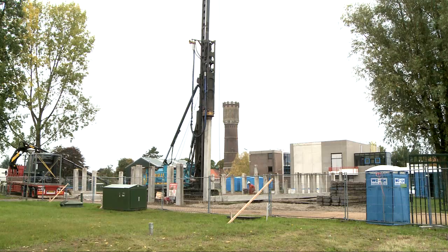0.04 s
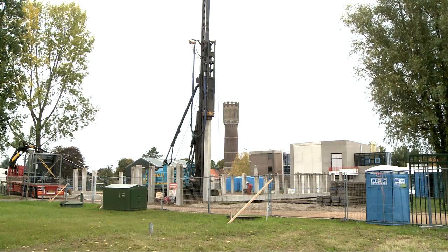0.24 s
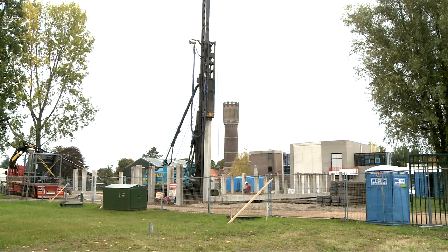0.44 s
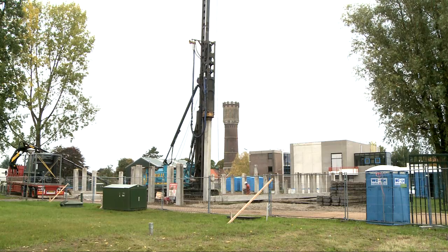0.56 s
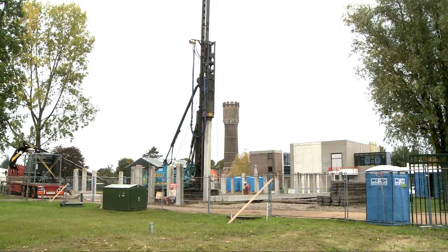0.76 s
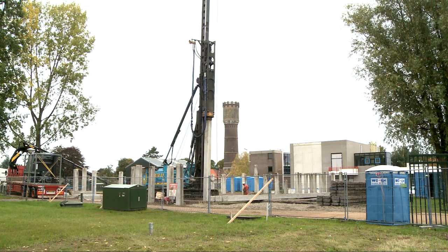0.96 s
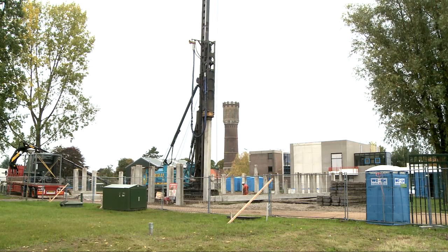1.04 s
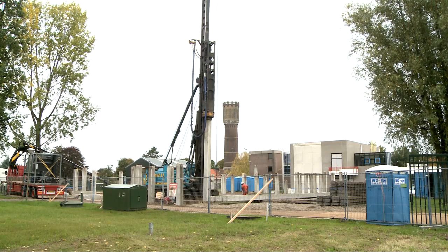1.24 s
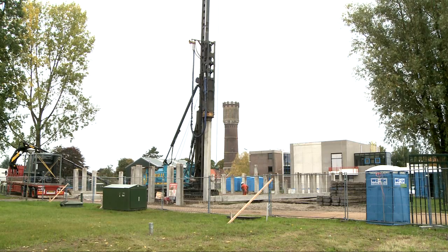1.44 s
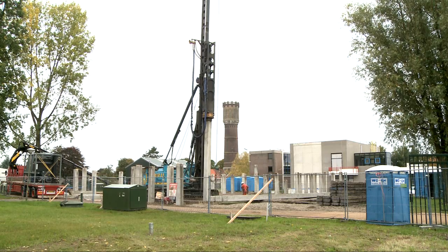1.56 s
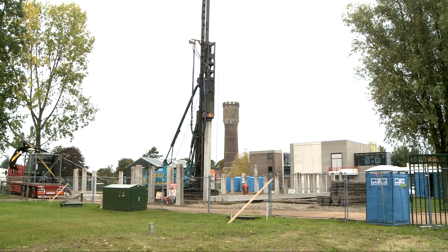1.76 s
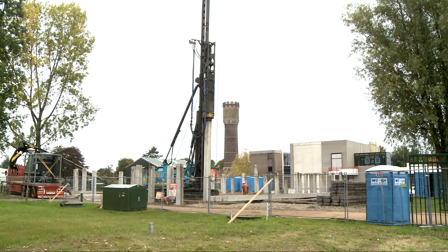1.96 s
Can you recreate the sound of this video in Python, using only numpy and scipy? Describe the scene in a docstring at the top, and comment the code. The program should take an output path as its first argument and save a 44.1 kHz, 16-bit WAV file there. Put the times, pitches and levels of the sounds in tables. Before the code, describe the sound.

A pile driver hits a concrete pile twice, each loud blow thumping, ringing the steel rig and echoing off distant buildings. Metal clanks and chinks between blows over a steady diesel, outdoors, left of the microphone.

```python
"""An open building site, a pile driver to the left of a stereo microphone. The ram falls twice on a
concrete pile, thumps the ground and rings the steel rig; distant buildings throw each blow back.
Between blows the hammer gear clanks and small steel parts chink, over a steady diesel.
The blows overload the recorder, whose limiter then holds the louder left side down."""
import sys
import numpy as np
from scipy import signal
from scipy.fft import rfft, irfft, next_fast_len
from scipy.io import wavfile
from scipy.ndimage import uniform_filter1d, minimum_filter1d, map_coordinates

SR = 44100
rng = np.random.default_rng(int(sys.argv[2]) if len(sys.argv) > 2 else 0)


def bounce(signal):
    """Save signal as a 16-bit WAV file at the path given by the first command-line argument."""
    frames = np.transpose(np.atleast_2d(signal))
    limited = np.clip(frames, -1, 1)
    pcm = np.round(limited * 32767).astype(np.int16)
    wavfile.write(sys.argv[1], SR, pcm)


N = 88200
T = np.arange(N) / SR

# long modes of the steel mast and hammer cage: f/Hz, level/dB, t60/s
MAST_MODES = [(176.4, -3.5, 1.06), (361.5, -1.5, 0.88), (409, -1, 1.05), (668, -1.5, 0.75), (811, -7, 0.86),
              (1028, -2.5, 1.17), (1065, -6, 1.32), (1222, -22, 0.55), (1557, -5.5, 0.82),
              (2220, -19, 0.91), (2312, -5.5, 1.33), (2595, -11, 0.86), (3133, -37, .7), (3404, -14, 1)]


def ram():
    """Each blow cracks, thumps the ground, rings pile and mast, and returns from the buildings."""
    # ram blows: t/s, level/dB, mast ring/dB, echo delay/s, echo/dB
    blows = [(0.348, 0, 2, 0.0976, -0.5), (1.5116, 0, 1, 0.0961, -1)]
    # short modes of helmet and pile: f/Hz, level/dB, t60/s
    pile_modes = [(180.8, -5.5, .3), (338.5, -14.5, 0.097), (424, -1, .12), (466.4, -8, .1), (780, 0, 0.1),
                  (855, 1.5, 0.088), (1013.6, -4.5, 0.13), (1082, 1.5, 0.056), (1235, -4.5, 0.083),
                  (1415, -14.5, 0.09), (1563, 0.5, 0.11), (1985, -10, 0.043), (2160, -4, 0.075),
                  (2612, -11.5, 0.15)]
    # spectrum of the impact: f/Hz, density/dB
    crack_spectrum = [(40, -14), (130, -3.5), (260, -5.5), (450, 3), (1000, -5), (2500, -6.5),
                      (3500, -14.5), (5000, -27), (9000, -28), (15000, -47)]
    # spectrum of its echo off the buildings: f/Hz, density/dB
    echo_spectrum = [(30, -7), (58, 2), (130, 9.5), (400, 0.5), (1000, -15), (2500, -2), (4000, -15.5),
                     (6000, -28.5), (14000, -44)]
    out = np.zeros((2, N))
    for s, db, ring_db, delay, echo_db in blows:
        crack = amp(-2.5) * noise(crack_spectrum) * envelope(s, rise=0.0032, hold=0.012, t60=0.048)
        ground = amp(1.5) * thump(s, hz=87.1, rise=0.0067, hold=0.014, t60=0.082)
        pile = amp(-4.5) * ring(s, pile_modes, rise=0.0018, drift=0.2, spread_s=0.00298)
        mast = amp(-21.5 + ring_db) * ring(s, MAST_MODES, rise=0.0036, drift=0.64)
        echo = amp(-16.5) * noise(echo_spectrum) * envelope(s + delay, rise=0.0079, hold=0.021, t60=0.19)
        boom = amp(-8) * thump(s + delay, hz=84.36, rise=0.0124, hold=0.024, t60=0.34)
        tail = amp(-12.5) * site_tail(s, rise=0.015)
        out += amp(db) * (crack + ground + pile + mast + tail + amp(echo_db) * (echo + boom))
    return out * pan(left_db=0.5)


def thump(s, hz, rise, hold, t60):
    """A few low cycles of pile and ground."""
    return envelope(s, rise, hold, t60) * np.sin(2 * np.pi * hz * (T - s))


def ring(s, modes, rise, drift, spread_s=0):
    """Modes struck at time s, each starting within spread_s and wandering by about drift radians."""
    out = np.zeros(N)
    for hz, db, t60 in modes:
        start = s + spread_s * rng.random()
        phase = 2 * np.pi * (hz * (T - start) + rng.random()) + drift * wobble(39.94)
        out += amp(db + rng.normal(0, 1)) * envelope(start, rise, 0, t60) * np.sin(phase)
    return out


def site_tail(s, rise):
    """Scatter from the ground and the site around; each frequency dies at its own speed."""
    # spectrum of the scatter: f/Hz, density/dB
    scatter_spectrum = [(30, -3), (60, 0), (130, 3.5), (260, -0.5), (420, 1.5), (1000, -7), (1700, -8.5),
                        (2500, -7.5), (3500, -18), (5000, -31), (10000, -34.5), (15000, -50)]
    # decay of the site: f/Hz, t60/s
    decay_times = [(60, 1.16), (200, 1.42), (500, 1), (2500, 1.42), (5000, 1.25), (14000, 0.86)]
    hz, t, bands = signal.stft(noise(scatter_spectrum), SR, nperseg=512)
    fade = np.exp(-np.log(1000) * np.maximum(t - s, 0) / along(decay_times, hz)[:, None])
    tail = signal.istft(bands * fade, SR, nperseg=512)[1][:, :N]
    return tail * np.clip((T - s) / rise, 0, 1)


def gear():
    """The hammer gear clanks: a dense steel clatter that also stirs the mast."""
    # clanks: t/s, level/dB, rise/s, t60/s, low edge/Hz, high edge/Hz
    clanks = [(0.111, -30.5, 0.0027, 0.37, 890, 3270), (0.251, -29, 0.0055, 0.76, 880, 3000),
              (1.032, -15.5, 0.0069, 0.43, 230, 7100), (1.36, -22, 0.0083, 0.58, 640, 2880)]
    # spectrum of the clatter: f/Hz, density/dB
    clatter_spectrum = [(150, 5), (450, 7.5), (800, 0), (1600, -4.5), (2600, -2.5), (3400, -18),
                        (5000, -25), (10000, -28), (15000, -33)]
    out = np.zeros((2, N))
    for s, db, rise, t60, low_hz, high_hz in clanks:
        band = lambda hz: (1 + (low_hz / (hz + 1)) ** 4) ** -.5 * (1 + (hz / high_hz) ** 4) ** -.5
        clatter = unit(filtered(noise(clatter_spectrum), band)) * envelope(s, rise, hold=0.013, t60=t60)
        mast = amp(-15) * ring(s, MAST_MODES, rise=0.013, drift=0.24)
        out += amp(db) * (clatter + mast)
    return out * pan(left_db=0.5)


def chinks():
    """Loose steel parts tick and ring high after the rig is shaken."""
    # contacts: t/s, tick/dB, low ring/dB, high ring/dB
    contacts = [(0.445, -47, -56, -46), (0.533, -47, -57, -57), (1.031, -42.5, -70, -60),
                (1.084, -43.5, -70, -61), (1.184, -51, -62, -77.5), (1.59, -57, -66, -50),
                (1.698, -43.5, -51.5, -51.5), (1.805, -75, -66, -55)]
    # lower and upper modes of the parts: f/Hz, level/dB, t60/s
    low_modes = [(6000, 2.5, 0.4), (6067, 2, 0.33), (6300, -1, .2)]
    high_modes = [(10050, -8, 0.55), (10410, 5.5, 0.43), (10520, 1.5, 0.27)]
    # spectrum of a tick: f/Hz, density/dB
    tick_spectrum = [(3000, -17), (6000, -2), (8500, -3), (15000, -16)]
    out = np.zeros((2, N))
    for s, tick_db, low_db, high_db in contacts:
        out += amp(tick_db) * noise(tick_spectrum) * envelope(s, rise=0.002, hold=0.006, t60=0.058)
        out += amp(low_db) * ring(s, low_modes, rise=0.002, drift=0.4)
        out += amp(high_db) * ring(s, high_modes, rise=0.002, drift=0.36)
    return amp(5) * out


def diesel():
    """Exhaust drone at the firing rate; steady machine noise pulses with each firing."""
    # engine: t/s, firing rate/Hz, exhaust level/dB
    engine = [(0.03, 79.6, -25), (0.3, 80.2, -23), (0.55, 81.17, -25.5), (0.901, 80.3, -26.5),
              (1.35, 78.75, -21.5), (1.65, 81.1, -27), (2.0, 81.7, -22)]
    # exhaust harmonics: multiple of the firing rate, level/dB
    orders = [(1, -1.5), (2, -19), (3, -21)]
    # spectrum of the machine noise: f/Hz, density/dB
    machine_spectrum = [(25, -9), (62, 0), (180, 2), (310, -7), (700, -9), (1500, -16.5), (2500, -15),
                        (3500, -24.5), (5000, -34.5), (8000, -43.5), (11000, -46.5), (12500, -60),
                        (15500, -60)]
    # steady whines: f/Hz, level/dB
    whines = [(226, -48.5), (1066, -49), (2304, -55), (3451, -56), (10640, -68.5)]
    s, rate, level = np.transpose(engine)
    phase = 2 * np.pi * np.cumsum(np.interp(T, s, rate)) / SR
    level_db = np.interp(T, s, level)
    exhaust = sum(amp(level_db + db + 0.6 * wobble(18.4)) * np.sqrt(2)
                  * np.sin(k * phase + 0.088 * wobble(25.2)) for k, db in orders)
    drift_db = 0.12 * (level_db - level.min())
    firing = 1 + 0.24 * np.sin(phase)
    machine = amp(-31.5 + drift_db + 0.54 * wobble(18)) * noise(machine_spectrum) * firing
    whine = sum(amp(db + 2.7 * wobble(12.33)) * np.sqrt(2)
                * np.sin(2 * np.pi * hz * T + hz / 9000 * wobble(250)) for hz, db in whines)
    return exhaust * pan(left_db=-0.1) + (machine + whine) * pan(left_db=1.5)


def noise(spectrum):
    """Coloured stereo noise of rms 1, near mono in the bass."""
    # likeness of the two channels: f/Hz, correlation
    likeness = [(40, .93), (300, .98), (1200, .96), (2300, .88), (4000, .55), (10000, .65)]

    def mid_side(hz):
        angle = np.arccos(np.clip(along(likeness, hz), 0, 1)) / 2
        return amp(along(spectrum, hz)) * [np.cos(angle), np.sin(angle)]

    mid, side = filtered(rng.standard_normal((2, N)), mid_side)
    return unit(np.array([mid + side, mid - side]))


def envelope(s, rise, hold, t60):
    """Straight rise from time s, exponential decay from s + hold; all in seconds."""
    return np.clip((T - s) / rise, 0, 1) * np.exp(-np.log(1000) * np.maximum(T - s - hold, 0) / t60)


def wobble(rate):
    """A smooth random curve, rate knots a second."""
    return map_coordinates(rng.standard_normal(1024), [T * rate], mode="wrap")


def filtered(x, response):
    """x through a complex frequency response."""
    size = next_fast_len(N + SR // 2)
    return irfft(rfft(x, size) * response(np.fft.rfftfreq(size, 1 / SR)), size)[..., :N]


def along(points, hz):
    """Interpolate (f/Hz, value) points on a log frequency axis."""
    freqs, values = np.transpose(points)
    return np.interp(np.log(hz + 1), np.log(freqs + 1), values)


def amp(db):
    """Decibels to amplitude."""
    return 10 ** (np.asarray(db) / 20)


def unit(x):
    """Scale to rms 1."""
    return x / np.sqrt(np.mean(x ** 2) + 1e-20)


def pan(left_db):
    """Channel gains that put left above right by left_db."""
    return amp([[left_db / 2], [-left_db / 2]])


def scene(lead_s=0.00006):
    """The rig stands left of the microphone: louder and slightly earlier on that side."""
    # balance at the microphone: f/Hz, left over right/dB
    balance = [(60, 12.9), (500, 11.4), (2000, 9.6), (4000, 12), (10000, 13.1)]
    sides = np.array([[.5], [-.5]])
    placement = lambda hz: amp(sides * along(balance, hz)) * np.exp(2j * np.pi * hz * sides * lead_s)
    return filtered(ram() + gear() + chinks() + diesel(), placement)


def limiter(x, threshold_db=-6, slope=0.39, max_cut_db=7.5, hold_s=0.87, release_s=0.12):
    """Each channel is turned down at once by a loud sound, held there, then released."""
    power = np.abs(uniform_filter1d(x ** 2, size=130, axis=1))
    over_db = 10 * np.log10(power + 1e-12) - threshold_db
    gain_db = -np.clip(slope * over_db, 0, max_cut_db)
    half_hold, half_release = int(hold_s * SR / 2), int(release_s * SR / 2)
    held = minimum_filter1d(gain_db, 2 * half_hold + 1, axis=1, origin=half_hold, mode="nearest")
    held = np.minimum(held, np.outer([-5.5, 0], T < 0.051))  # the left side starts turned down
    released = uniform_filter1d(held, 2 * half_release + 1, axis=1, origin=half_release, mode="nearest")
    return x * amp(np.minimum(held, released))


def record(dry, silence_s=0.0352, top_hz=15800):
    """The microphone dulls two treble bands; the recorder limits, clips and cuts the very top."""
    # dips in the microphone's response: f/Hz, width/Hz, level/dB
    dips = [(3114, 160, -3.5), (5060, 190, -8)]
    response = lambda hz: amp(sum(db * np.exp(-((hz - f) / width) ** 2) for f, width, db in dips))
    mic = filtered(dry, response)
    fade_in = np.clip((T - silence_s) / 0.004, 0, 1)  # the sound fades in after a brief silence
    clipped = np.clip(limiter(mic) * fade_in, -0.98, 0.98)
    return filtered(clipped, lambda hz: hz < top_hz)


dry = scene()
out = record(dry)
bounce(out)
```